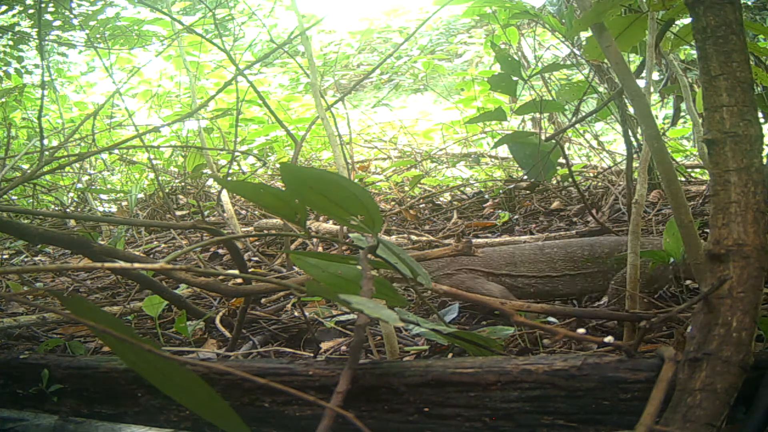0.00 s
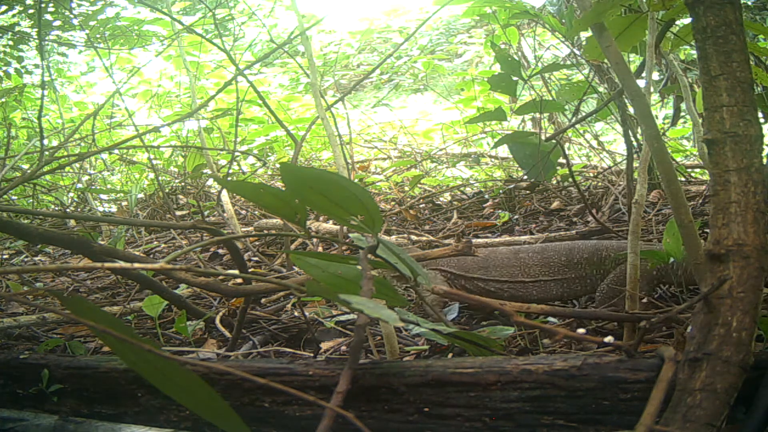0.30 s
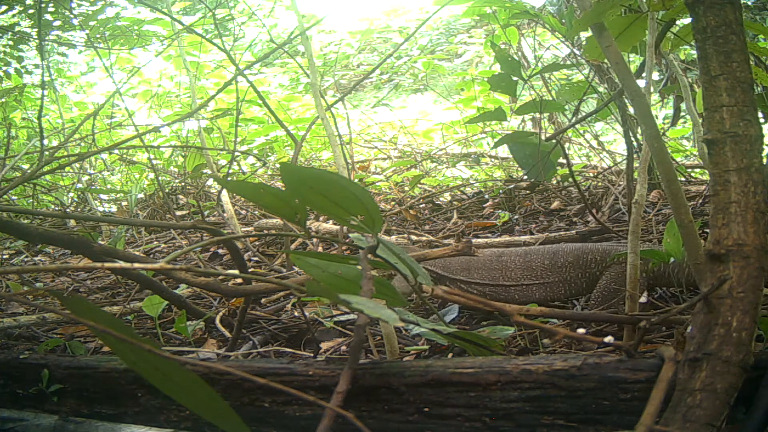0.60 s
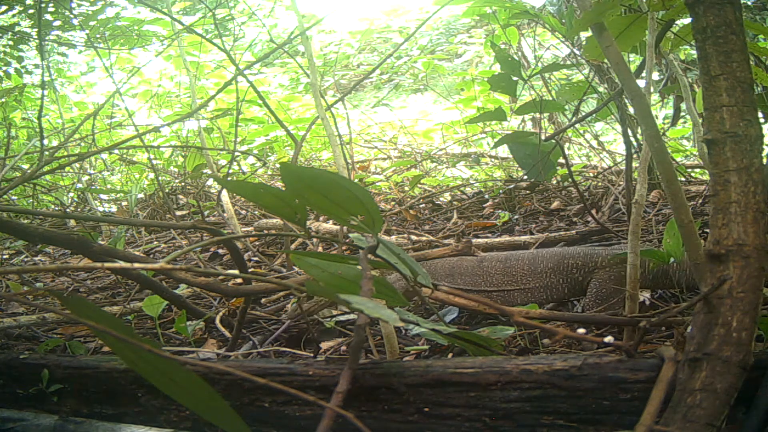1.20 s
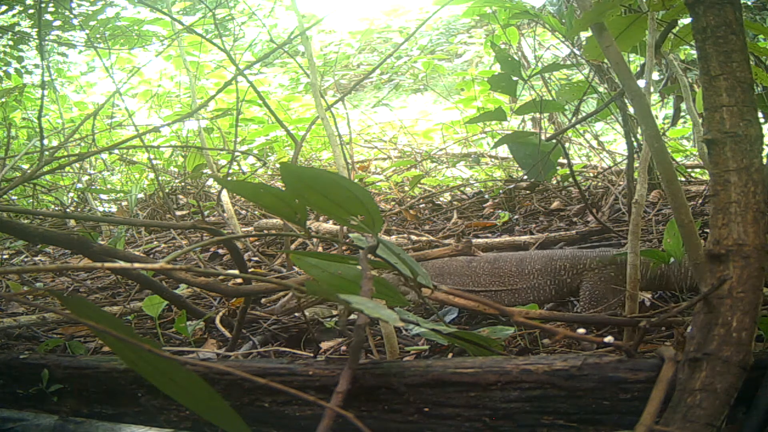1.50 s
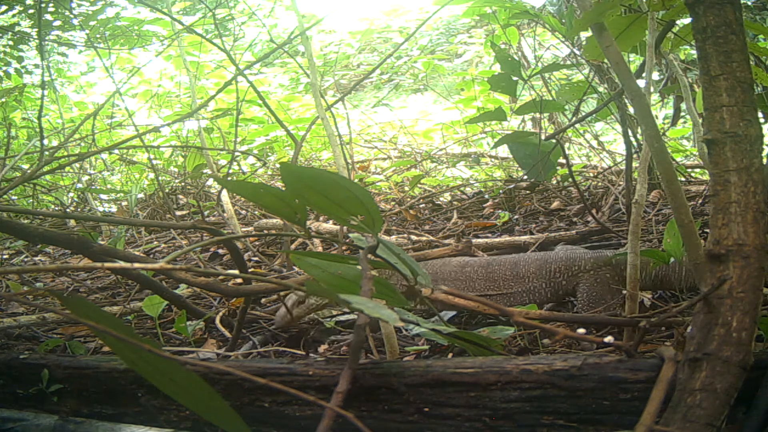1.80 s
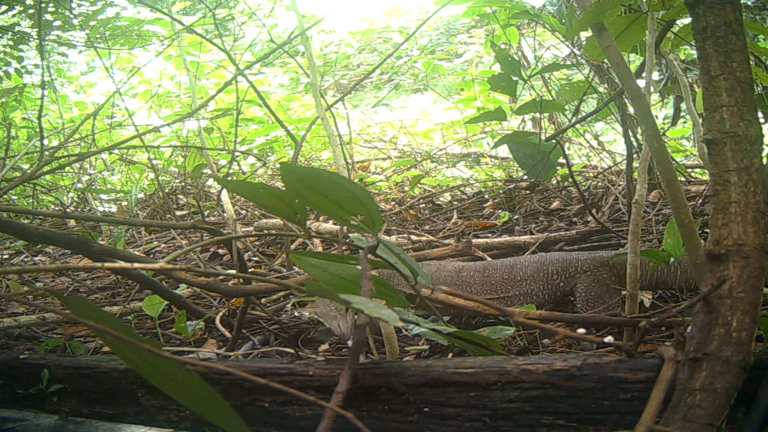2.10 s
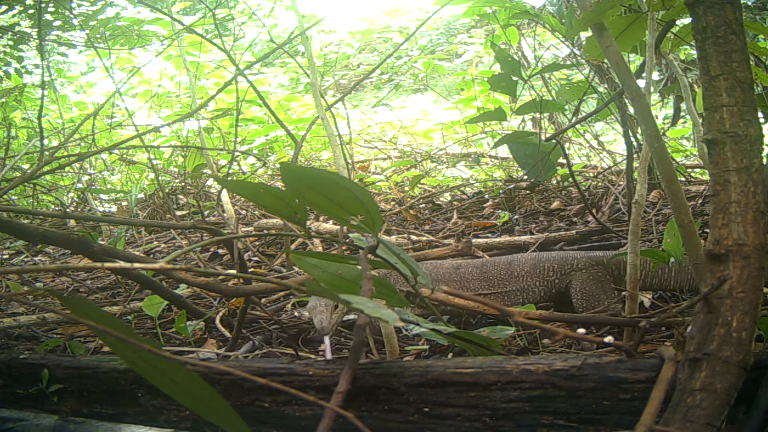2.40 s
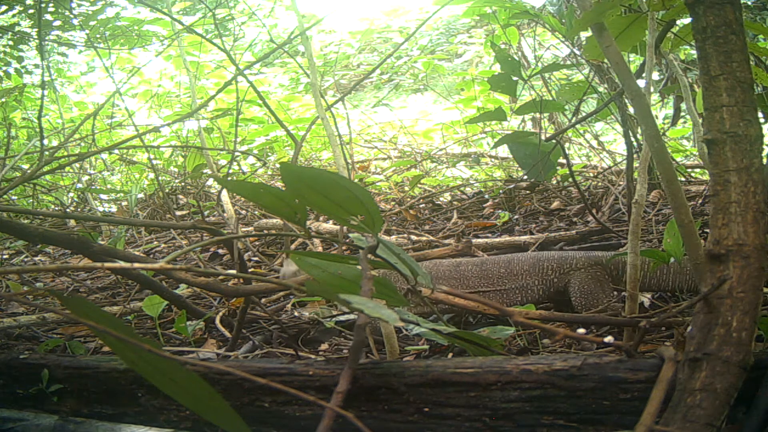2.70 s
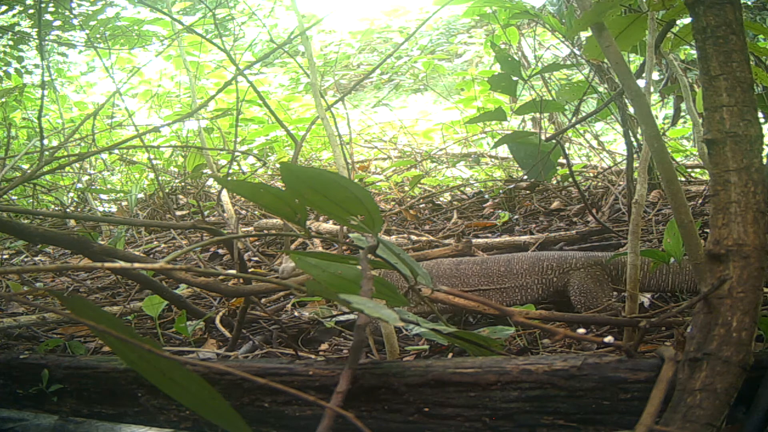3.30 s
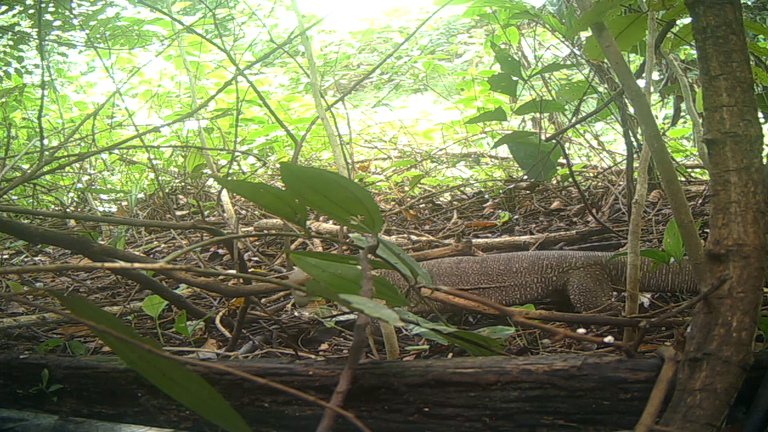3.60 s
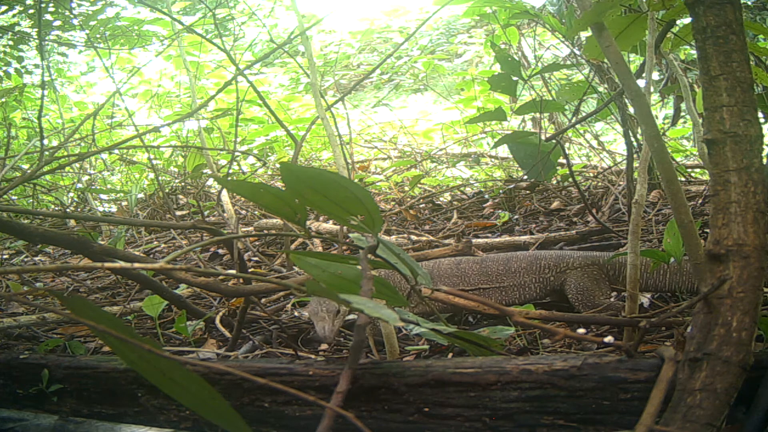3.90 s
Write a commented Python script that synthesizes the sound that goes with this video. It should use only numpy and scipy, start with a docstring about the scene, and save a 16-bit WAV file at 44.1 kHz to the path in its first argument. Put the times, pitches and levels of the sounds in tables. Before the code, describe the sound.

Cicadas drone steadily at a high pitch in a wood, over soft hiss and low rumble. Distant birds hoot faintly about once a second, and past the middle a lizard shifts softly in the leaf litter.

```python
"""In a wood, cicadas drone: their tymbal clicks drive a body resonance near 7 kHz, and foliage
scatters the sound. A monitor lizard shifts softly in the leaf litter, and far birds give faint
hoots, one of them about once a second. Beneath lie a thin high whine, an even hiss over a rumble
and a low wavering hum."""
import sys
import numpy as np
from scipy import signal
from scipy.fft import rfft, irfft
from scipy.io import wavfile

SR = 44100
rng = np.random.default_rng(int(sys.argv[2]) if len(sys.argv) > 2 else 0)


def pcm_store(signal):
    """Save signal as 16-bit PCM."""
    levels = np.round(np.clip(np.atleast_2d(signal), -1, 1) * 32767)
    wavfile.write(sys.argv[1], SR, levels.astype(np.int16).T)


N = 176400

# Each row: body pitch in Hz, clicks per second, throbs per second, level at that pitch in dB.
NEAR_CICADAS = [(7054, 91, 20.4, -53), (7320, 80, 23, -55.5), (7660, 86, 20, -56)]
def cicada(hz, click_rate, throb_rate, db):
    """Impulse excitation: buckling tymbals ring the body at its resonance and the octave above."""
    jitter = .05 * walk(60)  # cycles
    buckles = np.diff(np.floor(cycles(click_rate) + jitter), prepend=0) > 0
    throb_db = 4 * np.sin(2 * np.pi * cycles(throb_rate))
    force = undb(throb_db + 2 * walk(60))
    clicks = scatter(buckles * force, t60_s=.3, db=6)
    body = level(ring(clicks, hz, width_hz=356), db)
    octave = level(ring(clicks, 2 * hz, width_hz=520), db - 17)
    return body + octave

# Each row: frequency in Hz, relative spectral density in dB.
CHORUS_SPECTRUM = [(6000, -34), (6500, -34), (6750, -7), (7000, 0.5), (7500, -1), (7850, -2.5),
                   (8150, -6.5), (8450, -15), (9600, -39), (13300, -42), (13750, -12), (14250, -8),
                   (15100, -14), (15800, -30)]
def far_cicadas():
    """Incoherent summation: many distant callers merge into a flickering band of noise."""
    sizzle = level(colour(noise(), CHORUS_SPECTRUM), -50.5)
    return sizzle * undb(.25 * walk(25))

# Each row: frequency in Hz, relative response of damp leaves and twigs in dB.
LITTER_SPECTRUM = [(400, -16), (850, -4.5), (1100, -4), (1480, 2), (1750, -13), (2100, -4.5), (2600, -18),
                   (6000, -28), (12000, -40)]
# Each row: start in seconds, length in seconds, rustle level in dB, thud level in dB.
LIZARD_MOVES = [(2.354, 0.072, -56, -44.5), (2.466, 0.13, -56, -47), (2.59, 0.12, -61, -53),
                (3.4, 0.053, -59, -56)]
def lizard(t):
    """Shot noise: each move crushes many small leaves, while the damped ground thuds under it."""
    grains_per_s, attack_s, release_s = 2500, .028, .065
    cracks = rng.random(N) < grains_per_s / SR
    grains = cracks * noise() * undb(3 * noise())
    leaves = level(colour(grains, LITTER_SPECTRUM))
    ground = level(ring(noise(), hz=135.6, width_hz=120))
    out = np.zeros(N)
    for start, length, rustle_db, thud_db in LIZARD_MOVES:
        rise = np.clip((t - start) / attack_s, 0, 1)
        fall = np.clip((start + length - t) / release_s + .5, 0, 1)
        out += rise * fall * (undb(rustle_db) * leaves + undb(thud_db) * ground)
    return out

# Each row: start in seconds, pitch in Hz, level of the direct sound in dB.
BIRD_HOOTS = [(.405, 862, -64), (.665, 1160, -67), (1.385, 874, -64), (2.39, 877, -60), (3.195, 1080, -66),
              (3.36, 872, -65)]
def far_birds(t):
    """Reverberation: the wood draws each short, pure hoot out into a fading tail."""
    hoot_s = .07
    calls = np.zeros(N)
    for start, hz, db in BIRD_HOOTS:
        arch = np.sin(np.pi * np.clip((t - start) / hoot_s, 0, 1))
        calls += np.sqrt(2) * undb(db) * arch * np.sin(2 * np.pi * hz * t)
    return scatter(calls, t60_s=.51, db=-4)

def whine():
    """Frequency modulation: a thin, high tone wavers slightly at random."""
    hz = 8858 + 5 * walk(19)
    return level(np.sin(2 * np.pi * np.cumsum(hz) / SR), -74)

# Each row: frequency in Hz, relative spectral density in dB.
AIR_SPECTRUM = [(10, 1.5), (22, 1), (60, -2), (110, -7.5), (170, -11), (240, -15.5), (400, -19.5),
                (600, -24.5), (950, -24.5), (1500, -26.5), (2200, -29), (4500, -32), (10000, -33),
                (15300, -34), (16000, -42)]
def air():
    """Broadband noise: the hiss of air and a distant rumble swell gently together."""
    return level(colour(noise(), AIR_SPECTRUM), -45) * undb(.66 * walk(1.9))

# Each row: centre frequency in Hz, level in dB.
HUM_BANDS = [(35.5, -47.5), (49, -50.5), (75, -54.5), (99, -57), (150.5, -56.5), (209, -68.5)]
def hum():
    """Narrowband noise: close frequencies beat within each band, so the low hum wavers."""
    return sum(level(ring(noise(), hz, width_hz=3.6), db) for hz, db in HUM_BANDS)

def ring(x, hz, width_hz):
    """Resonance: two like poles in cascade pass a steep-sided band."""
    f = np.fft.rfftfreq(N, 1 / SR)
    return irfft(rfft(x) / (1 + 2j * (f - hz) / width_hz) ** 2, N)

def scatter(x, t60_s, db):
    """Multiple scattering: leaves and trunks add dense reflections that decay exponentially."""
    tail = noise() * np.exp(-np.log(1000) * np.arange(N) / SR / t60_s)
    tail /= np.linalg.norm(tail)
    return x + undb(db) * irfft(rfft(x) * rfft(tail), N)

def colour(x, points):
    """Spectral shaping: a filter joins (Hz, dB) points along a log frequency axis."""
    hz, db = np.array(points).T
    f = np.maximum(np.fft.rfftfreq(N, 1 / SR), 1)
    gain = undb(np.interp(np.log(f), np.log(np.sort(hz)), db))
    return irfft(rfft(x) * gain, N)

def cycles(rate):
    """Phase accumulation: a running count of cycles whose rate drifts by about 3 percent."""
    return np.cumsum(rate * (1 + .03 * walk(3))) / SR + rng.random()

def walk(rate):
    """Low-pass noise of unit rms, changing about rate times a second."""
    f = np.fft.rfftfreq(N, 1 / SR)
    return level(irfft(rfft(noise()) * np.exp(-(f / rate) ** 2) * (f > 0), N))

def noise():
    """Gaussian white noise."""
    return rng.standard_normal(N)

def level(x, db=0):
    """Normalisation to an rms level in dB."""
    return x * undb(db) / np.sqrt(np.mean(x ** 2))

def undb(db):
    """Decibels to amplitude ratio."""
    return 10 ** (np.asarray(db) / 20)

def scene():
    """Superposition: the sounds of the wood add in one channel."""
    t = np.arange(N) / SR
    near_cicadas = sum(cicada(*row) for row in NEAR_CICADAS)
    return (near_cicadas + far_cicadas() + lizard(t) + far_birds(t) + whine() + air() + hum())[None]

def record(dry):
    """Band limiting: a steep low-pass cuts the top, and the waveform rests slightly off zero."""
    top_hz, dc_offset = 16000, .0119
    lowpass = signal.ellip(10, .2, 70, top_hz, fs=SR, output="sos")
    return signal.sosfilt(lowpass, dry) + dc_offset

dry = scene()
out = record(dry)
pcm_store(out)
```